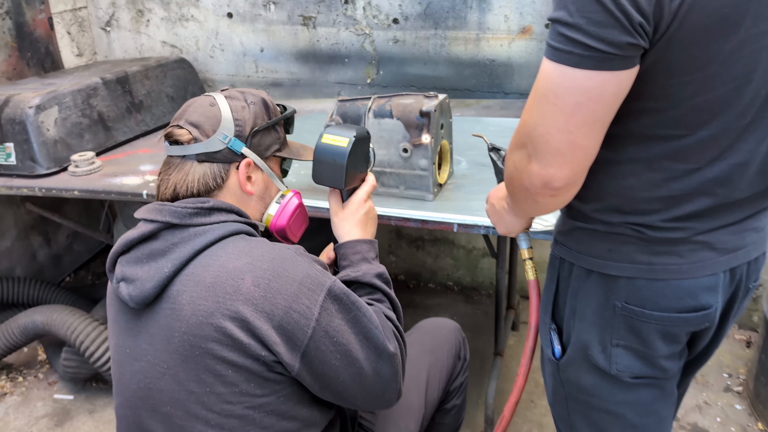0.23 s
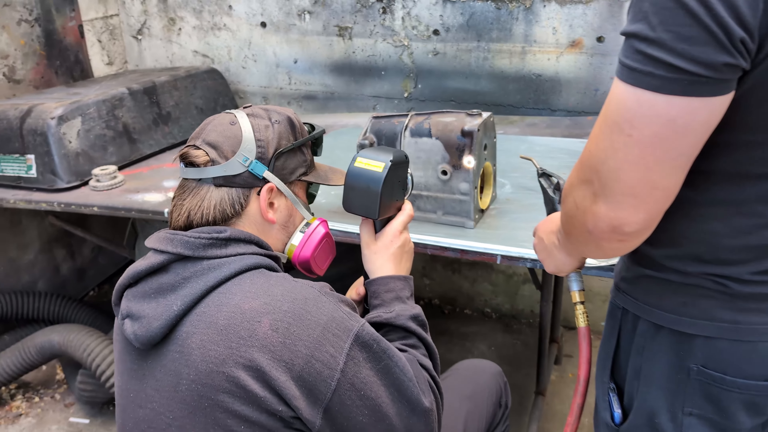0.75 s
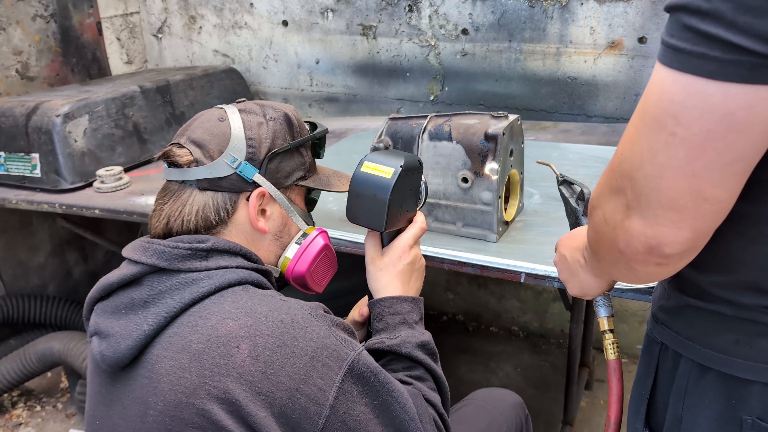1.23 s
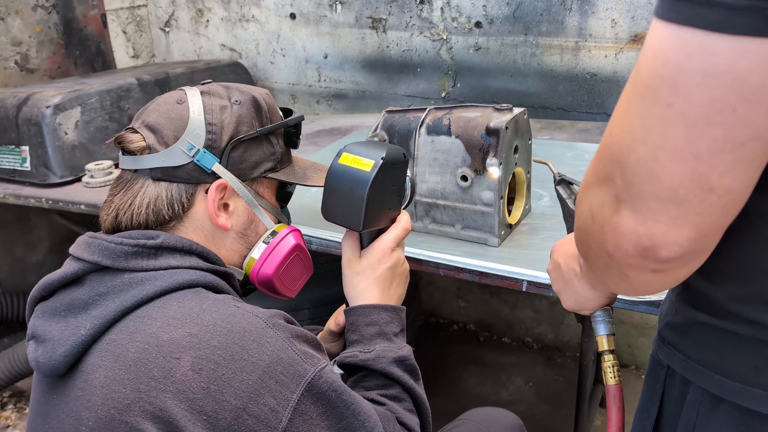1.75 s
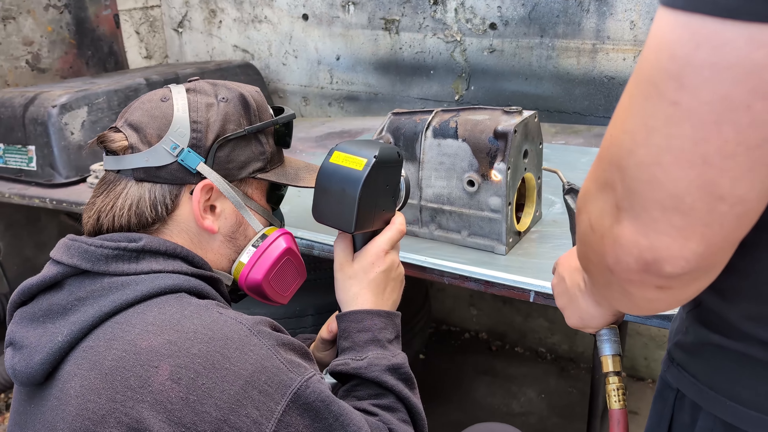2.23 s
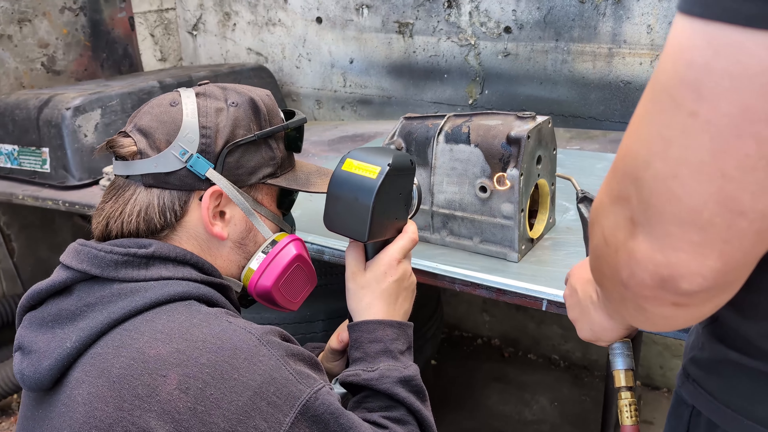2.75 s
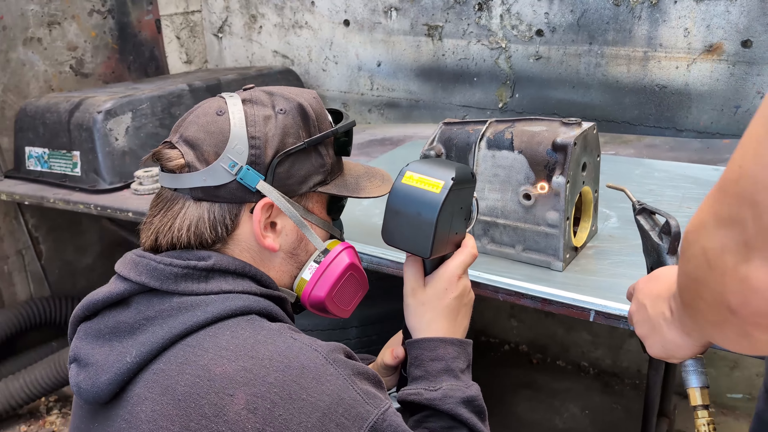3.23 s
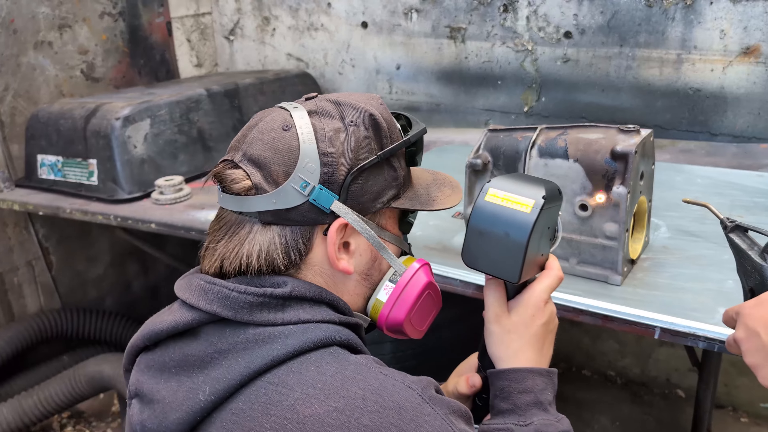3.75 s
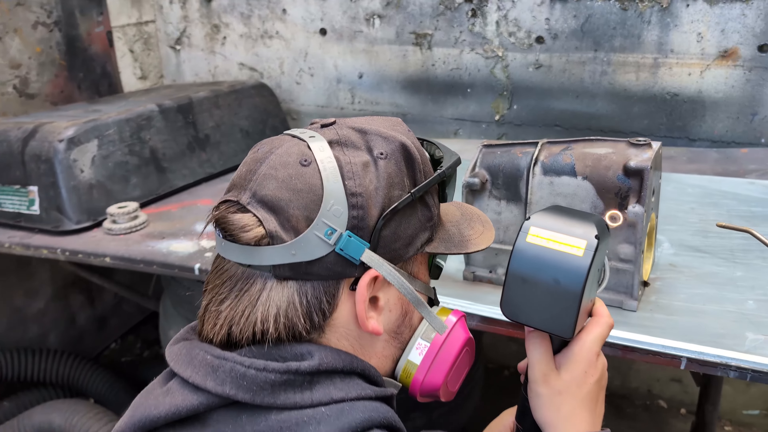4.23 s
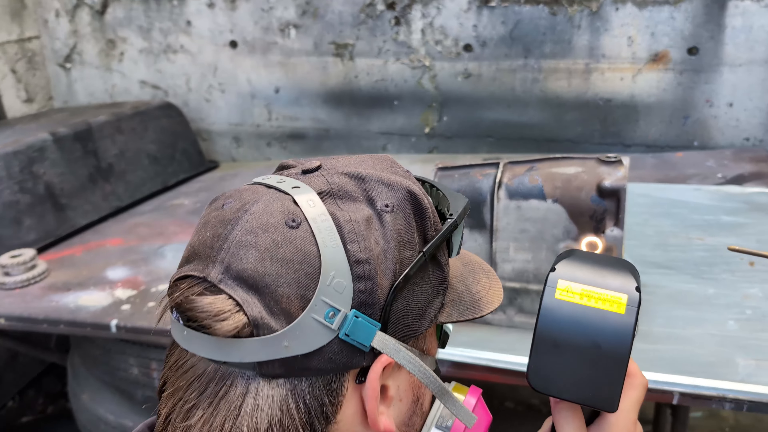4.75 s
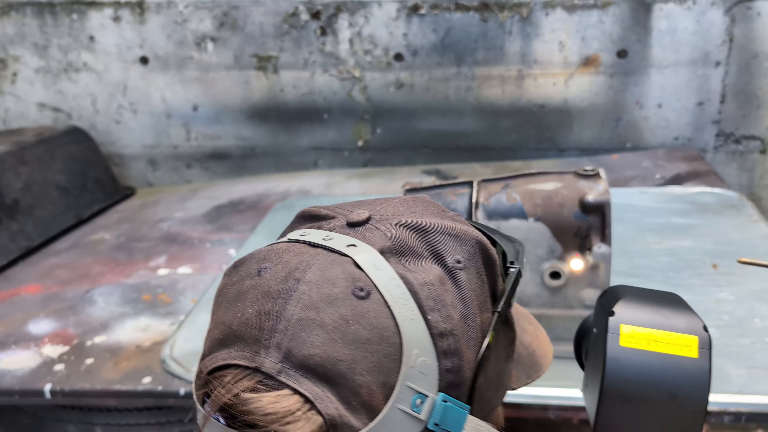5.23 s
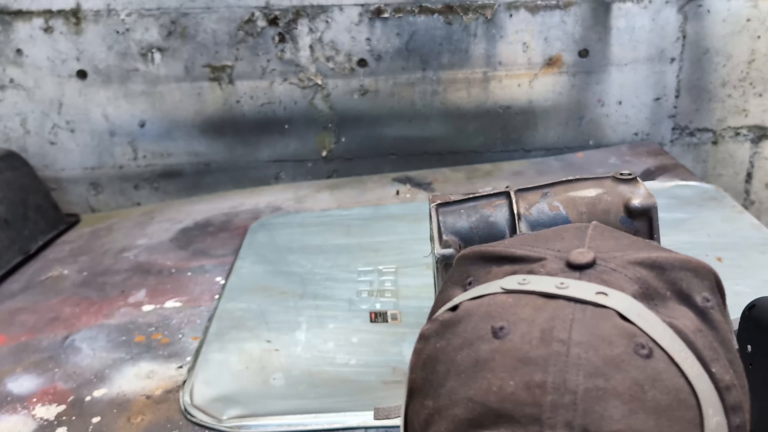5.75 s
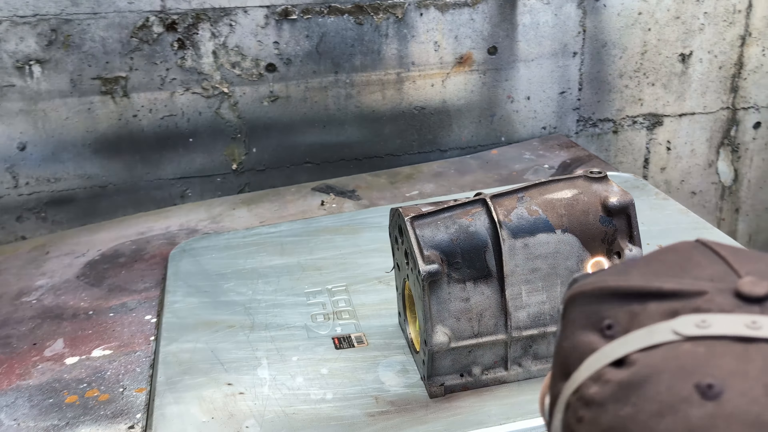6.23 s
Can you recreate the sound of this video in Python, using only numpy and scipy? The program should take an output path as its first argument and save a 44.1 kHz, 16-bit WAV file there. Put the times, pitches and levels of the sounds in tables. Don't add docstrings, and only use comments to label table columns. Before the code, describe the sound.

A close generator drones and roars steadily, growing louder, while a laser's sharp, bright sizzle swells over it with brief crackling bursts of burning paint.

```python
import sys
import numpy as np
from scipy import signal
from scipy.fft import rfft, irfft
from scipy.io import wavfile
from scipy.ndimage import map_coordinates

SR = 44100
rng = np.random.default_rng(int(sys.argv[2]) if len(sys.argv) > 2 else 0)


def boost_factor(decibels):
    exponent = np.asarray(decibels, float) / 20
    return 10 ** exponent


def digitize_waveform(pressure):
    field = np.atleast_2d(pressure).T
    bounded = np.clip(field, -1, 1)
    quanta = np.round(bounded * 32767).astype(np.int16)
    wavfile.write(sys.argv[1], SR, quanta)


N = 286650


def curves(table):
    s, *columns = np.transpose(table)
    return [np.interp(np.arange(N) / SR, s, c) for c in columns]


def walk(rate):
    knots = rng.standard_normal(int(rate * 7) + 4)
    return map_coordinates(knots, [np.arange(0, N, 64) / SR * rate + 1], order=3).repeat(64)[:N]


def colour(x, table, slope=1):
    hz, db = np.transpose(table)
    f = np.maximum(np.arange(N // 2 + 1) * SR / N, 1)
    return rfft(x) * boost_factor(slope * np.interp(np.log(f), np.log(hz), db))


def band(spectrum, lo_hz, hi_hz, soft=0.17):
    f = np.log(np.maximum(np.arange(N // 2 + 1) * SR / N, 1))
    above_low = np.clip((f - np.log(lo_hz)) / soft + 0.5, 0, 1)
    above_high = np.clip((f - np.log(hi_hz)) / soft + 0.5, 0, 1)
    return irfft(spectrum * (above_low - above_high), N)


def rms(x):
    return np.sqrt(np.mean(x ** 2))


# time in seconds, distance to the generator in metres.
WALK_IN = [(0, 3.06), (.4, 2.58), (1.1, 1.88), (2.0, 1.45), (3.0, 1.23), (3.6, 1.2), (4.3, 1.065),
           (5.0, 0.99), (6.5, 0.96)]
WALL_S, WALL_TAKES_S = 5, 1.3


def heard_db(db, share, wall_db):
    metres, = curves(WALK_IN)
    wall = np.clip((np.arange(N) / SR - WALL_S) / WALL_TAKES_S, 0, 1)
    return db - share * 20 * np.log10(np.maximum(metres, 0.1)) + wall * wall_db


# time in seconds, how far the left port is ahead of the right in milliseconds.
LEFT_AHEAD = [(0, .5), (3.5, .5), (4.5, .44), (5.2, .36), (6.5, .32)]
# pitch in Hz, scattered over direct sound in dB.
SCATTERED = [(60, -20), (250, -0.5), (800, -2.5), (2500, 1.5), (5000, 0)]


def ports(air, share):
    lead_ms, = curves(LEFT_AHEAD)
    late = map_coordinates(air[0], [np.arange(N) - lead_ms * SR / 1000], order=3, mode="nearest")
    scattered = irfft(colour(air[1:], SCATTERED), N)
    return share * np.array([air[0], late]) + scattered


# pitch in Hz, level in dB per Hz.
ROAR_TONE = [(20, -20), (40, -9), (60, -1), (150, 2.5), (300, -1), (700, 1.5), (950, 2.5), (1150, -2),
             (2300, -4.5), (3400, -8), (4500, -14), (9000, -22), (16000, -24)]
# level at 1 m in dB, share of the distance law from 0 to 1,
# change at the wall in dB.
ROAR_STRENGTH = [
    (-30.5, 0.87, -1.5),
    (-32.5, 1, -2.5),
]
ROAR_PAN_DB = 1.66


def roar(turn, throb=0.039, swell_db=0.4, flicker_db=0.65, direct=0.85):
    low_db, high_db = (heard_db(*law) for law in ROAR_STRENGTH)
    throbbing = 1 + throb * np.cos(2 * turn) + throb * np.cos(4 * turn + 1)
    air = rng.standard_normal((3, N)) * throbbing
    spectrum = colour(ports(air, direct), ROAR_TONE)
    low_rms = rms(band(spectrum, 280, 1400))
    high_rms = rms(band(spectrum, 1500, 3500))
    edges = 20 * 2 ** np.arange(0, 10, 2 / 3)
    out = 0
    for lo, hi in zip(edges, edges[1:]):
        db, ref = (low_db, low_rms) if lo < 1200 else (high_db, high_rms)
        moving_db = db + swell_db * walk(1.393) + flicker_db * walk(9)
        out = out + band(spectrum, lo, hi) * boost_factor(moving_db) / ref
    return out * boost_factor(np.array([[1], [-1]]) * ROAR_PAN_DB / 2)


# time in seconds, shaft turns per second.
SHAFT_SPEED = [(0, 31.12), (1.2, 31.18), (1.75, 31.39), (2.75, 31.02), (3.2, 31.19), (4.1, 31.28),
               (4.8, 31.07), (5.85, 31.3), (6.5, 31.18)]
# multiple of the shaft speed, dB under the fourth multiple
# from afar, the same from near, left minus right in dB.
WHINES = [(3, -16, -29, 5), (7, -19, -19.5, 1), (8, -19, -22.5, -1), (9, -36, -27, -16),
          (10, -32.5, -23, -1), (12, -26.5, -32.5, -3), (13, -26, -21, 0), (14, -28, -30, -7),
          (16, -26, -24, -6.5), (19, -22.5, -32.5, -3), (20, -23, -22, -6), (21, -28, -31, 9),
          (22, -26, -23.5, 5.5), (23, -35, -42, 2), (24, -28, -29.5, -7), (26, -21, -23, -3),
          (27, -23.5, -24.5, 2), (28, -25, -18, 5.5), (30, -13, -14, 9), (31, -19, -26, -5),
          (32, -23.5, -25.5, -5.5), (33, -28, -23, -6), (34, -31, -20.5, -5), (36, -33, -34, -2),
          (38, -23, -23, 1), (39, -23, -32, -5), (40, -29.5, -27, 2), (41, -40, -30, -7),
          (42, -22.5, -24.5, 1.5), (48, -23.5, -28, 1)]
# multiple of the shaft speed, level at 1 m in dB,
# share of the distance law from 0 to 1, change at the wall in dB.
STRONG_TONES = [(4, -20, 0.96, -2), (2, -27, 0.68, 2.5), (5, -29.5, 0.66, 3.5), (6, -44.5, .3, 12),
                (13, -46.5, 1, 3), (20, -47, 0.44, 2.5), (28, -44.5, 0.5, -3), (30, -32, 0.8, -17)]
# multiple of the shaft speed,
# middle in seconds, change in dB, length in seconds.
ECHO_FADES = [(20, 0.74, 14, 0.4), (20, 3.23, 8, 0.33), (20, 3.5, 11, 0.46), (20, 4.5, 9, .3),
              (20, 6, 3, .4), (13, 2.2, 3.5, 0.21), (13, 3.3, 7.5, .6), (13, 3.82, 7.5, 0.67),
              (13, 4.35, 10, 0.37), (13, 4.6, 4.5, 0.28), (13, 6.0, 8, 0.14), (13, 6.3, 5.5, 0.16),
              (75.2, 4.7, 16, .7), (24, 6.3, 8, .6), (27, 2.2, 4, 0.87), (19, 4.5, 8, .5),
              (28, 3.89, 13, .5), (28, 5.7, 12, .4), (30, 0.67, -8, 0.47), (30, .1, -7, 0.53),
              (30, 2.8, -1, 0.59), (30, 5.25, 2, 0.38), (30, 2.74, -13, 0.19), (30, 3.91, -9, .4),
              (30, 4.3, -1, 0.21), (6, 3.7, 4, .3), (6, 4.3, -8, .4)]
# pitch in Hz, dB under the fourth multiple.
CHILLER_TONES = [(39, -31), (78, -24), (234, -27), (2335, -29.5)]


def engine(wander_db=2.5, held_db=1, wander_rad=0.9, apart_rad=0.79, even_db=-31, odd_db=-35):
    step = 6
    shaft_hz, lead_ms = (c[::step] for c in curves(SHAFT_SPEED) + curves(LEFT_AHEAD))
    strong = {round(k): heard_db(*law)[::step] for k, *law in STRONG_TONES}
    main_db = strong[4]
    turn = 2 * np.pi * np.cumsum(shaft_hz) * step / SR
    t = np.arange(len(shaft_hz)) * step / SR
    near = np.clip((t - 1.5) / 4.0, 0, 1)
    level = {k: main_db + (odd_db if k % 2 else even_db) for k in range(35, 79)}
    level.update({round(k): main_db + far + near * (close - far) for k, far, close, _ in WHINES})
    level.update(strong)
    for k, s, db, length in ECHO_FADES:
        level[round(k)] = level[round(k)] + db * np.exp(-(2 * (t - s) / length) ** 2)
    pan = {round(k): db for k, *_, db in WHINES}
    chiller = sum(boost_factor(main_db + db) * np.sin(2 * np.pi * hz * t) for hz, db in CHILLER_TONES)
    out = np.zeros((2, len(shaft_hz))) + chiller
    for k, db in level.items():
        loose = min(k / 14, 1) ** 2 + 0.047
        fade_db = loose * (held_db if k in strong else wander_db)
        pipe = 1.74 + 0.09 * k - 0.13 * k * k + np.pi * (k in (3, 6, 7))
        phase = k * turn + pipe + loose * wander_rad * walk(3)[::step]
        for port, sign in enumerate((1, -1)):
            drift = fade_db / wander_db * apart_rad * walk(1.494)[::step]
            slip = drift + sign * np.pi * k * shaft_hz * lead_ms / 1000
            gain = boost_factor(db + sign * pan.get(k, 0) / 2 + fade_db * walk(2.873)[::step])
            out[port] += np.sqrt(2) * gain * np.cos(phase + slip)
    drone = signal.resample_poly(out, step, 1, axis=1)[:, :N]
    return drone, np.repeat(turn, step)[:N]


# middle in seconds, level in dB, length in seconds.
THICK_PAINT = [(0.603, -44, .1), (0.917, -42.5, .06), (1.243, -37.5, 0.073), (1.53, -38, .07),
               (1.78, -34.5, 0.054), (1.95, -50, .06), (2.173, -33.5, 0.082), (2.71, -40, 0.091),
               (3.044, -30.5, 0.076), (3.498, -29, .1), (3.627, -35.5, 0.12), (3.934, -32, 0.096),
               (4.076, -45, 0.05), (4.3, -38, .08), (4.5, -38, 0.084), (4.687, -35, .12), (4.883, -42, .1),
               (5.07, -35.5, .07), (5.37, -32, 0.086), (5.747, -30, 0.071), (6.089, -32, 0.051)]
FLARE_EDGE_S = 0.011


def flares():
    t = np.arange(N) / SR
    total = 0
    for s, db, length in THICK_PAINT:
        shape = (1 - np.tanh((abs(t - s) - length / 2) / FLARE_EDGE_S / 2)) / 2
        total = total + boost_factor(2 * db) * shape
    return total


# time in seconds, sizzle level in dB,
# left minus right in dB.
BURNING_SPOT = [(0, -45, 0), (.5, -41, -1), (1.4, -42, -0.5), (2.1, -38.5, 2), (3.2, -38, 1.5),
                (3.4, -39, .5), (3.55, -34.5, -2.5), (4.3, -33, -3.5), (4.7, -32, -4), (5.1, -34.5, -2),
                (5.6, -32.5, -3), (6.2, -34, 0.5), (6.5, -32, 4)]
# pitch in Hz, level in dB per Hz.
BURN_TONE = [(2240, -24), (3800, -9.5), (5080, -6.5), (5660, -5.5), (8520, -6), (11400, 6), (14800, -5),
             (15700, -3)]
# pitch in Hz, left minus right in dB.
PORT_DIFFERENCE = [(3500, 0), (6000, -1.5), (8800, 3.5), (11500, 1.5), (13000, -3), (15500, 3.5)]
HISS_DB, HISS_SHARE, HISS_WALL_DB = -38, 0.77, 1.3
TOP_DB = -3
FLARE_LOWER_DB, FLARE_TOP_DB = -3.5, -2.5


def burn(rate=2500, spread_db=1.5, crack_db=-8, flicker_db=1.0, direct=0.16):
    level_db, pan_db = curves(BURNING_SPOT)
    flare = flares()

    def with_flares(steady_db, flare_db):
        return np.sqrt(boost_factor(2 * steady_db) + flare * boost_factor(2 * flare_db))

    size = np.minimum(rng.exponential(size=N), 4)
    cracks = (rng.random(N) < rate / SR) * rng.standard_normal(N) * boost_factor(spread_db * size)
    hiss = rng.standard_normal((3, N)) * boost_factor(flicker_db * walk(40))
    spot = np.sqrt(direct) * hiss[0] + cracks * boost_factor(crack_db) / rms(cracks)
    moved = map_coordinates(spot, [np.arange(N) + 18 + 3 * walk(1.5)], order=3, mode="nearest")
    pair = np.sqrt(1 - np.clip(direct, 0, 1)) * hiss[1:] + [spot, moved]
    pair = [irfft(colour(p, PORT_DIFFERENCE, sign / 2), N) for p, sign in zip(pair, (1, -1))]
    spectrum = colour(pair, BURN_TONE)
    lower = band(spectrum, 20, 9200) / rms(band(spectrum, 4500, 9000))
    peak = band(spectrum, 9200, 12900) / rms(band(spectrum, 9500, 12800))
    top = band(spectrum, 12900, 20000) / rms(band(spectrum, 13000, 15700))
    upper = peak * with_flares(level_db, 0) + top * with_flares(level_db + TOP_DB, FLARE_TOP_DB)
    lower = lower * with_flares(heard_db(HISS_DB, HISS_SHARE, HISS_WALL_DB), FLARE_LOWER_DB)
    side_db = np.array([pan_db, -pan_db]) / 2
    return (lower * boost_factor(0.5 * side_db) + upper * boost_factor(side_db)) * boost_factor(2.0)


def scene():
    drone, turn = engine()
    return drone + boost_factor(1.0) * roar(turn) + burn()


def low_pass(x):
    return signal.sosfilt(signal.butter(12, 15870, fs=SR, output="sos"), x)


# pitch in Hz, change in dB.
PHONE_TONE = [(8300, 0), (8850, -1.5), (9250, 0.5), (12000, 0), (13200, -1), (14600, 2.5), (15600, 0.5),
              (15850, -12)]
# pitch in Hz, gain of the left-right difference in dB.
STEREO_WIDTH = [(60, -5), (125, -4.5), (250, -4), (700, 0.5), (2000, 0.5)]


def record(dry):
    dry = irfft(colour(dry, PHONE_TONE), N)
    mid = (dry[0] + dry[1]) / 2
    side = (dry[0] - dry[1]) / 2
    side = irfft(colour(side, STEREO_WIDTH), N)
    return low_pass(np.array([mid + side, mid - side]))


dry = scene()
out = record(dry)
digitize_waveform(out)
```